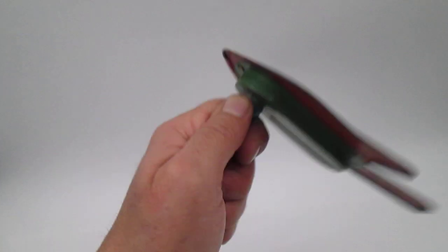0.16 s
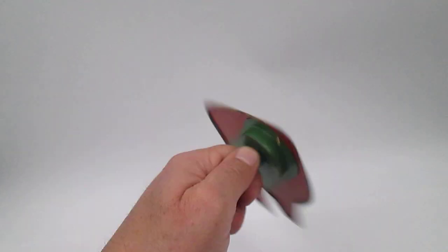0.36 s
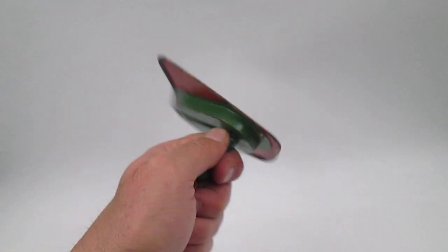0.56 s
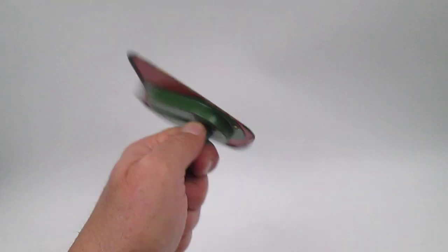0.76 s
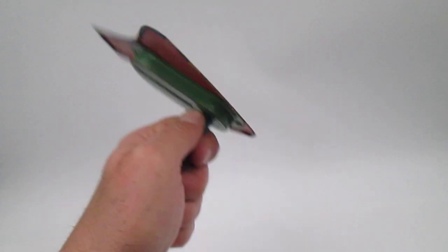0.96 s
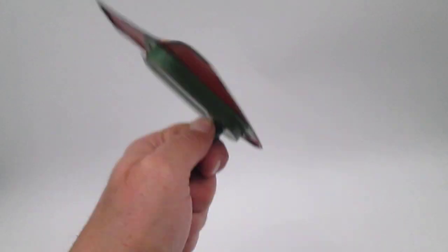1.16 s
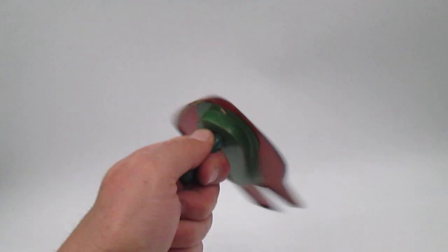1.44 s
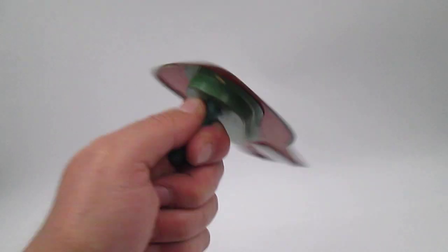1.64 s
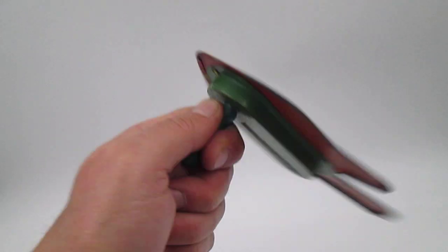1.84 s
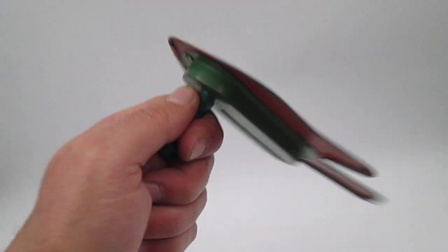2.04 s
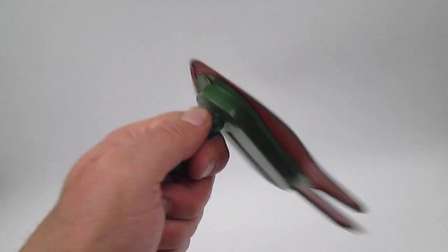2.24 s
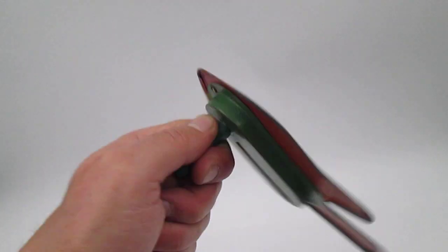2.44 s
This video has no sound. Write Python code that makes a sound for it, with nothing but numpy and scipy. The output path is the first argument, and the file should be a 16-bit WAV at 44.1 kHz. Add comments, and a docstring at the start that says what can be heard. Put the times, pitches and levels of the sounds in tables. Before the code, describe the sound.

Harsh, dense clatter of a hand-spun tin noisemaker, surging brighter once every turn, close up

```python
"""Whirled tin ratchet

A tin toy ratchet is whirled by hand close to the microphone, about five turns a second, over soft rumble.
Its tongue snaps over the cog and chatters: showers of random clicks are filtered by modes of the tin body.
Once a turn it bites hard and bright, then runs lighter and duller; single modes ring out now and then.
A near reflection and a short room tail follow; decaying and swelling sines make handle thumps and hums."""
import sys
import numpy as np
from scipy import signal
from scipy.fft import rfft, irfft
from scipy.io import wavfile
from scipy.ndimage import map_coordinates

SR = 44100
rng = np.random.default_rng(int(sys.argv[2]) if len(sys.argv) > 2 else 0)


def to_wav(s):
    """Save 16-bit WAV."""
    ch = np.atleast_2d(s).T  # columns
    pcm = np.round(np.clip(ch, -1, 1) * 32767)  # PCM
    wavfile.write(sys.argv[1], SR, pcm.astype(np.int16))


N = 114219
T = np.arange(N) / SR  # time axis, s
START_S = 0.2065  # the ratchet and the rumble come in here


def amp(db):
    """Turns decibels into gain."""
    return 10 ** (np.asarray(db) / 20)


def evened(x):
    """Scales a signal to unit rms."""
    return x / np.sqrt(np.mean(x ** 2) + 1e-20)


def read(hz, points_hz, values):
    """Joins points by straight lines on a log-frequency axis."""
    return np.interp(np.log(hz + 1), np.log(np.add(points_hz, 1)), values)


def add(mix, start_s, sound):
    """Mixes a sound in at its start time."""
    part = mix[max(round(start_s * SR), 0):][:len(sound)]
    part += sound[:len(part)]


def causal(gain, size=8192):
    """Makes the minimum-phase impulse response, the quickest one with this spectrum."""
    log_gain = np.log(np.maximum(gain, 1e-5))
    mirrored = np.r_[log_gain, log_gain[-2:0:-1]]
    spectrum = np.exp(np.conj(signal.hilbert(mirrored)))
    return np.fft.ifft(spectrum).real[:size // 2]


def pluck(t, rise_s):
    """Envelope that climbs to 1 at the rise time, then dies away."""
    return t / rise_s * np.exp(1 - t / rise_s)


# Spectral shape of the rumble: pitch_hz [Hz], level_db [dB, relative]
RUMBLE_SHAPE = [(12, -48), (20, -16), (102, -2), (129, 0.5), (156, 0.5), (219, -11), (400, -7.5),
                (520, -57), (880, -120)]
RUMBLE_DB = -60.5  # overall rms


def rumble():
    """Noise of the room: random samples coloured in the spectrum."""
    colour = amp(read(np.fft.rfftfreq(N, 1 / SR), *np.transpose(RUMBLE_SHAPE)))
    noise = irfft(rfft(rng.standard_normal(N)) * colour, N)
    return amp(RUMBLE_DB) * evened(noise) * (T >= START_S)


ROOM_DB, ROOM_T60_S = -11, 0.2  # tail energy against the direct sound; time to decay by 60 dB


def room(x):
    """A short, quiet tail of sparse scattered reflections that die exponentially."""
    t = T[:SR // 3]
    tail = rng.standard_normal(len(t)) * (rng.random(len(t)) < 0.05)
    tail = tail * (t > 0.004) * 1000 ** (-t / ROOM_T60_S)
    return amp(ROOM_DB) * signal.fftconvolve(x, tail / np.linalg.norm(tail))[:N]


# Low modes of the wings that swell and fade:
# start_s [s], length_s [s], level_db [dB, peak], pitch_hz [Hz]
WING_HUMS = [(.31, .18, -50.5, 165), (1.088, 0.18, -48.5, 165.5), (1.538, 0.19, -52, 163.8),
             (0.403, 0.051, -38, 582), (.785, 0.098, -34.5, 597), (1.02, 0.061, -41.5, 597),
             (1.256, 0.059, -38, 590), (1.452, 0.086, -39, 591), (1.681, 0.077, -41.5, 590.5),
             (2.23, 0.083, -40.5, 594), (2.436, 0.05, -47, 587)]


def wing_hums():
    """Low rings of the wings: sines under a half-sine swell."""
    out = np.zeros(N)
    for start_s, length_s, level_db, pitch_hz in WING_HUMS:
        t = np.arange(0, length_s, 1 / SR)
        swell = np.sin(np.pi * t / length_s)
        add(out, start_s, amp(level_db) * swell * np.sin(2 * np.pi * pitch_hz * t))
    return out


# Soft thumps of the handle in the fingers:
# start_s [s], level_db [dB, envelope peak], pitch_hz [Hz], rise_s [s]
HANDLE_THUMPS = [(0.205, -33.5, 45.4, 0.0023), (.365, -44, 105, 0.013), (1.961, -42, 213, 0.0036),
                 (2.161, -38, 200, 0.0024), (2.357, -41, 215, 0.0044), (2.56, -36.5, 202.5, 0.003)]


def handle_thumps():
    """Handle thumps: low sines with a soft rise and a quick decay."""
    out, t = np.zeros(N), T[:SR // 6]
    for start_s, level_db, pitch_hz, rise_s in HANDLE_THUMPS:
        add(out, start_s, amp(level_db) * pluck(t, rise_s) * np.sin(2 * np.pi * pitch_hz * t))
    return out


# Moments when the chatter locks onto one mode and rings it hard:
# start_s [s], level_db [dB, envelope peak], rise_s [s], pitch_hz [Hz]
MODE_CATCHES = [(0.221, -7.5, 0.0009, 4500), (.238, -11, 0.0018, 4630), (0.249, -9, 0.002, 1705),
                (0.316, -7.5, 0.0012, 4480), (0.44, -7.5, 0.0012, 4430), (.462, -11.5, 0.0017, 4420),
                (0.521, -20, 0.0026, 4560), (0.532, -7, 0.0024, 4496), (.659, -15, 0.0039, 1626),
                (.706, -11.5, 0.0012, 4550), (.899, -16, 0.0028, 1560), (1.309, -21, 0.0013, 4650),
                (1.338, -15, .0025, 4520), (1.345, -8.5, 0.002, 4554), (1.900, -14.5, 0.0092, 1593),
                (2.112, -12, 0.003, 1625), (2.309, -13, 0.004, 1623), (2.509, -15, 0.0074, 1594)]


def catches():
    """Short hard rings of a single mode: sines at random phase with a fast rise."""
    out, t = np.zeros(N), T[:SR // 10]
    for start_s, level_db, rise_s, pitch_hz in MODE_CATCHES:
        tone = np.sin(2 * np.pi * (pitch_hz * t + rng.random()))
        add(out, start_s, amp(level_db) * pluck(t, rise_s) * tone)
    return out


# The hard bite of each turn and the lull after it: start_s [s], end_s [s],
# bite_db [dB, weighted by the bite share], lull_db [dB, weighted by 1.5 minus that share]
BITES = [(.19, .325, 0, -1.5), (0.384, 0.538, 0, -3), (0.649, 0.757, 0, -1), (0.869, 0.977, 0.5, -1.5),
         (1.055, 1.183, -1.5, -2), (1.293, 1.386, -2, -2.5), (1.505, 1.633, -2.5, -3.5),
         (1.704, 1.822, -1, -3), (1.873, 1.99, -1.5, -2.5), (2.075, 2.192, -2.5, -1.5),
         (2.281, 2.399, -2.5, -2), (2.468, 2.62, -0.5, -5)]
SWING_S = 0.037  # time to swing in or out of the bite
ARCH_DB = -5.5  # bite drive at its middle against half a turn away, before the bite share


def motion():
    """Hand motion: turns completed, share of hard bite 0-1, and the force on the tongue."""
    start_s, end_s, bite_db, lull_db = np.transpose(BITES)
    middle_s = (start_s + end_s) / 2
    period_s = np.mean(np.diff(middle_s))
    marks_s = np.r_[middle_s[0] - period_s, middle_s, middle_s[-1] + period_s]
    turn = np.interp(T, marks_s, np.arange(len(marks_s)))  # whole numbers fall mid-bite
    inside_s = np.max([np.minimum(T - a, b - T) for a, b in zip(start_s, end_s)], 0)
    bite = np.clip(0.5 + inside_s / SWING_S, 0, 1)
    arch_db = ARCH_DB * (np.cos(2 * np.pi * turn) - 1) / 2
    hard_db = np.interp(T, middle_s, bite_db) + arch_db
    light_db = np.interp(T, middle_s + period_s / 2, lull_db)
    return turn, bite, amp(bite * hard_db + (1.5 - bite) * light_db)


# Teeth passing the tongue: time_s [s], rate [teeth per s]
COG_RATE = [(.2, 61), (.33, 95), (.55, 92), (1.1, 106), (2.6, 110.3)]
TOOTH_JITTER, TOOTH_SPREAD_DB = 0.14, 2.06  # random unevenness of timing (teeth) and of strength
SNAP = 0.24  # gain of the first snap against the chatter
CHATTER_S, LOOSE = 0.0068, 1  # decay time of the bounces; steady loose rattle under them
CLICKS_PER_S, CLICK_SPREAD_DB = 7000, 2
FIRST_DB, FIRST_S = 2.5, 0.0037  # the jerk that starts the spin: boost added to the shower, decay time


def tongue():
    """Each tooth snaps the tongue, which bounces in a quickly dying shower of tiny clicks."""
    slip, size = rng.standard_normal((600, 2)).T
    passed = np.cumsum(np.interp(T, *np.transpose(COG_RATE)) * (T >= START_S)) / SR
    at = np.searchsorted(passed, 1 + np.arange(len(slip)) + TOOTH_JITTER * slip)
    keep = (at > 0) & (at < N - 1)
    snaps = np.zeros(N)
    snaps[at[keep]] = amp(TOOTH_SPREAD_DB * size[keep])
    bounces = signal.lfilter([1], [1, -np.exp(-1 / (CHATTER_S * SR))], snaps)
    jerk = amp(FIRST_DB) * np.exp(-abs(T - START_S) / FIRST_S)
    shower = evened(LOOSE + bounces) + jerk
    hits = (rng.random(N) < CLICKS_PER_S / SR) * rng.choice([-1, 1], N)
    clicks = evened(hits * amp(CLICK_SPREAD_DB * rng.standard_normal(N)))
    return evened(shower * clicks + SNAP * evened(snaps)) * (T >= START_S)


# Modes of the tin, each radiating in a lobe that turns with the toy:
# pitch_hz [Hz], width_hz [Hz], level_db [dB, relative, centre of the lobe swing],
# lobe_db [dB, swing either way before the tanh shaping], facing [turns, when it faces the microphone]
TIN_MODES = [(580, 19.4, -22, 0, 0.58), (812, 55, -23, 6.5, 1.06), (1016, 46, -22.5, 12, 0.4),
             (1104, 47, -12.5, 4, 0.75), (1180, 64, -17.5, 5, 0.98), (1445, 40, -12, -5, 0.94),
             (1612.5, 37, 0, 5, 1.004), (1635, 36, -11.5, 3, 0.61), (1870, 57.2, -14, 6.5, 0.53),
             (1841.6, 29.5, -6, 5.5, 0.9), (2139, 47, -12.5, 5, 0.76), (2363, 18, -20.5, 17.5, 1.07),
             (2544, 106, -26.5, 17.5, 0.58), (2772, 55, -8, 6.5, 1.01), (3027, 66, -15, 10, 0.46),
             (3283, 62, -19, 11, 1.04), (3745, 90, -14.5, 6.5, 0.48), (3880, 42, -14, 9.5, 0.42),
             (4160, 64, -10, 4.5, 0.78), (4347, 136, -11.5, 3.5, 1.08), (4555, 121, -6, 5.5, 1.006),
             (4990, 120, -16, 3, 0.67), (5274, 58, -14, 9, 1.01), (5600, 51, -15.5, 8.5, 0.54),
             (6645, 124, -17, 6, .99), (7250, 84, -18.5, 3.5, .8), (8200, 100, -34, -12, 0.16),
             (8410, 120, -29.5, 5, .8), (9300, 130, -29.5, 12.5, 2), (10030, 65, -18.5, 0, .5),
             (11920, 130, -28, 9, 0.18), (12600, 200, -30, 6, 1.1), (15000, 330, -31, 5, 1)]
# Dense wash of higher modes: pitch_hz [Hz], bite_db [dB, relative], lull_db [dB, relative]
TIN_WASH = [(40, -35.5, -50), (252, -30.5, -45), (417, -33.5, -43), (670, -48, -30), (1020, -22, -29),
            (1485, -22.5, -19), (2400, -23, -20), (3480, -19.5, -20.5), (4180, -12, -18.5),
            (5140, -15, -25), (6300, -20, -25), (7200, -28, -27), (7800, -28, -24.5), (8200, -20.5, -24.5),
            (9530, -25.5, -33.5), (10400, -26, -35), (12270, -28, -28), (13060, -33, -40),
            (13700, -35, -38), (14500, -39, -40), (15998, -39, -44)]
SKIRT = 4.5  # widths beyond which a mode sinks into the wash
LOBE_EDGE = 1.06  # how squarely a lobe cuts in and out
RIPPLE_DB, RIPPLE_HZ = 4, 217.9  # random ripple of the wash: spread at its points, and their spacing
RADIATE_HZ = 490  # below this the small body radiates poorly


def tin(angle, size=8192):
    """Ring of the body as heard at this angle (turns; 0 is the middle of the bite)."""
    hz = np.fft.rfftfreq(size, 1 / SR)
    points_hz, bite_db, lull_db = np.transpose(TIN_WASH)
    front = np.cos(np.pi * angle) ** 2
    wash_db = read(hz, points_hz, front * bite_db + (1 - front) * lull_db)
    ripple = map_coordinates(rng.standard_normal(size), [hz / RIPPLE_HZ], order=3)
    power = amp(wash_db + RIPPLE_DB * ripple) ** 2
    for pitch_hz, width_hz, level_db, lobe_db, facing in TIN_MODES:
        off = (2 * (hz - pitch_hz) / width_hz) ** 2
        lobe = np.tanh(LOBE_EDGE * np.cos(2 * np.pi * (angle - facing)))
        peak = amp(level_db + lobe_db * lobe)
        power = power + peak ** 2 / (1 + off) / (1 + off / (2 * SKIRT) ** 2)
    radiated = hz ** 4 / (hz ** 4 + RADIATE_HZ ** 4)
    return causal(np.sqrt(power * radiated))


RATTLE_DB = 1.5  # gain of the ratchet
ECHO_S, ECHO_SWING_S = 0.001114, 0.00026  # a nearby surface: mean delay and its swing either way
ECHO_TURNS, ECHO_GAIN = 0.703, 0.21  # angle of the longest path (turns); strength


def ratchet(count=8):
    """The tongue drives the body, whose sides pass the microphone in turn; a near reflection sweeps along."""
    turn, _, force = motion()
    drive = tongue() * force
    direct = np.zeros(N)
    for angle in np.arange(count) / count:
        away = abs((turn - angle + 0.5) % 1 - 0.5)
        share = np.maximum(1 - count * away, 0)  # crossfade between neighbouring angles
        direct += share * signal.oaconvolve(drive, tin(angle))[:N]
    delay_s = ECHO_S + ECHO_SWING_S * np.cos(2 * np.pi * (turn - ECHO_TURNS))
    echo = map_coordinates(direct, [(T - delay_s) * SR], order=3)
    return amp(RATTLE_DB) * (direct + ECHO_GAIN * echo)


def scene():
    """The ratchet and its catches in the room, over thumps, hums and rumble."""
    toy = ratchet() + catches()
    handling = handle_thumps() + wing_hums()
    return (toy + room(toy) + handling + rumble())[None]


NOTCH_HZ, NOTCH_Q = 7850, 43
EDGE_HZ = 15800  # top of the band


def record(dry):
    """The microphone's narrow notch, then a steep low-pass at the band limit."""
    notched = signal.lfilter(*signal.iirnotch(NOTCH_HZ, NOTCH_Q, SR), dry)
    lowpass = signal.firwin(511, EDGE_HZ, window=("kaiser", 9), fs=SR)
    return signal.oaconvolve(notched, lowpass[None], "same")


dry = scene()
out = record(dry)
to_wav(out)
```